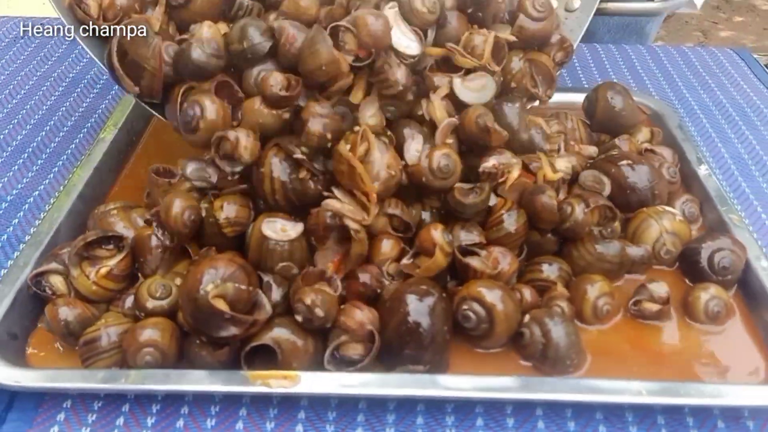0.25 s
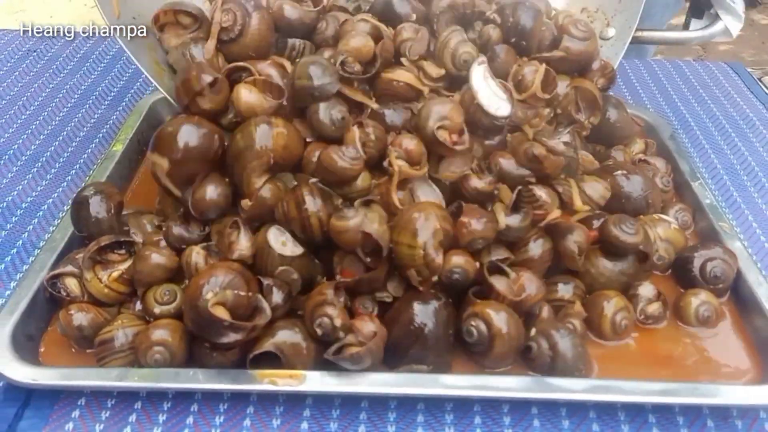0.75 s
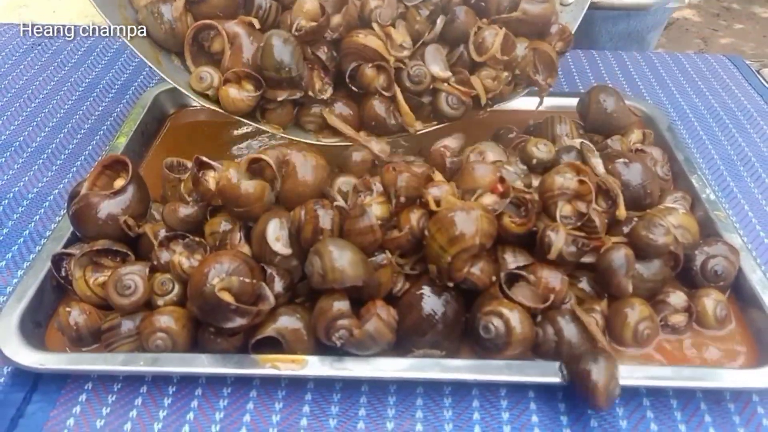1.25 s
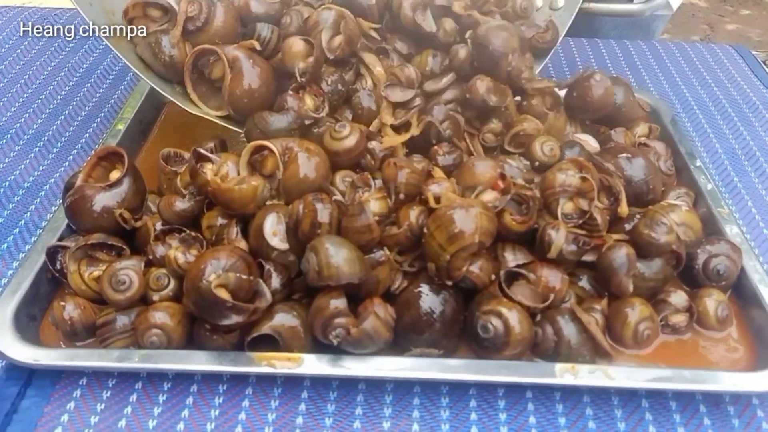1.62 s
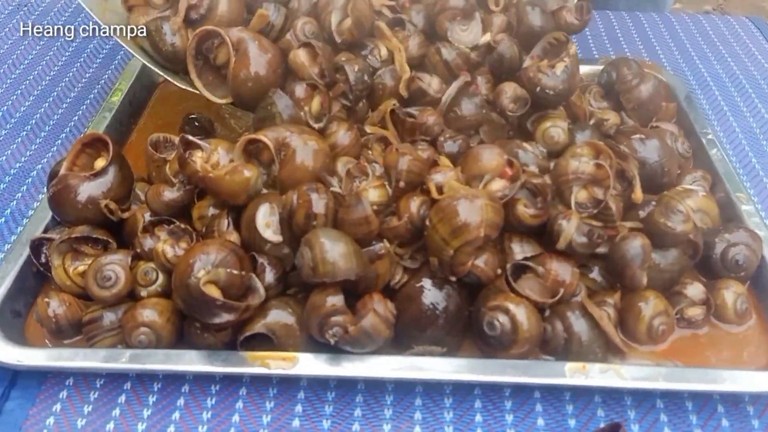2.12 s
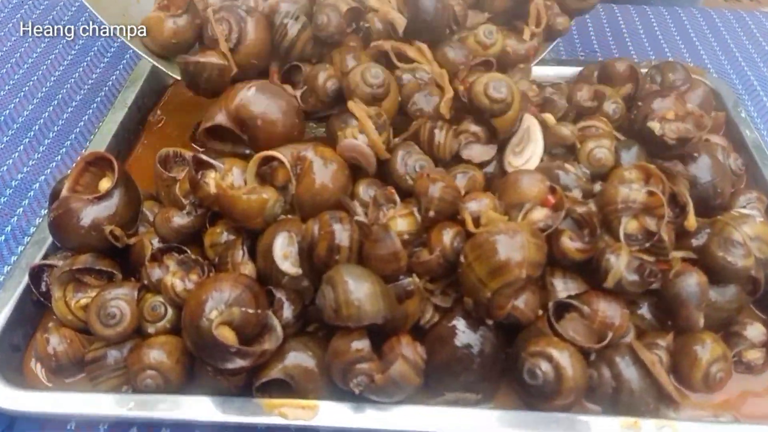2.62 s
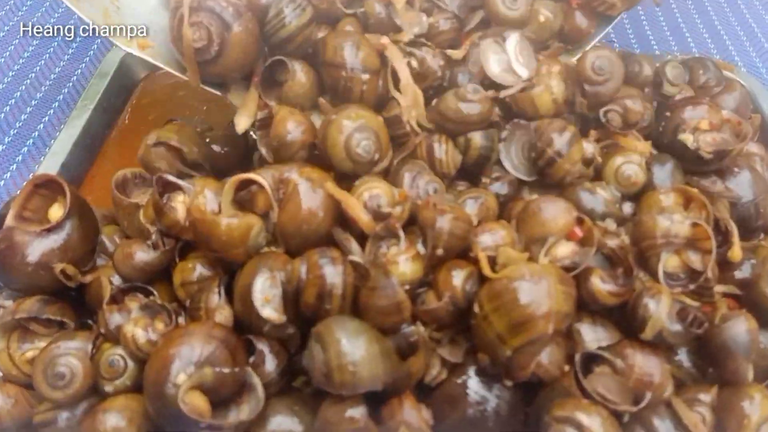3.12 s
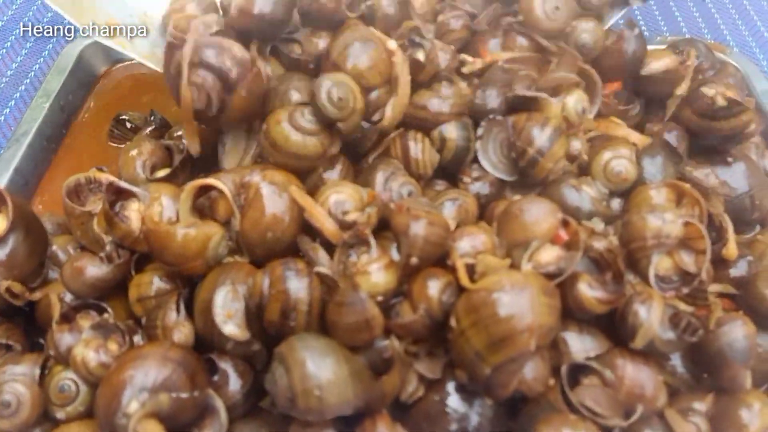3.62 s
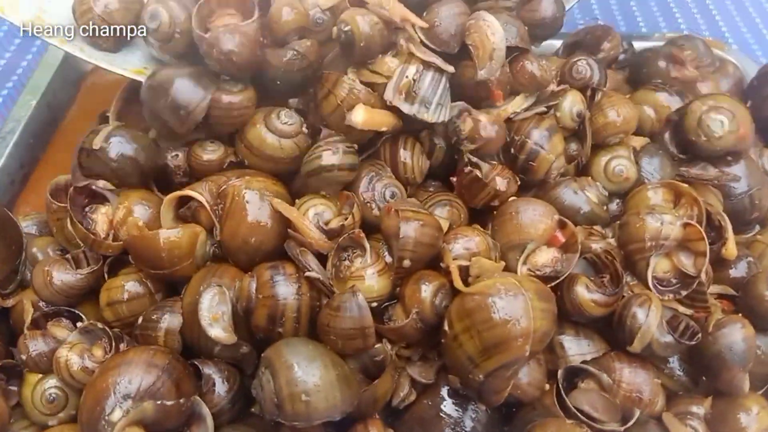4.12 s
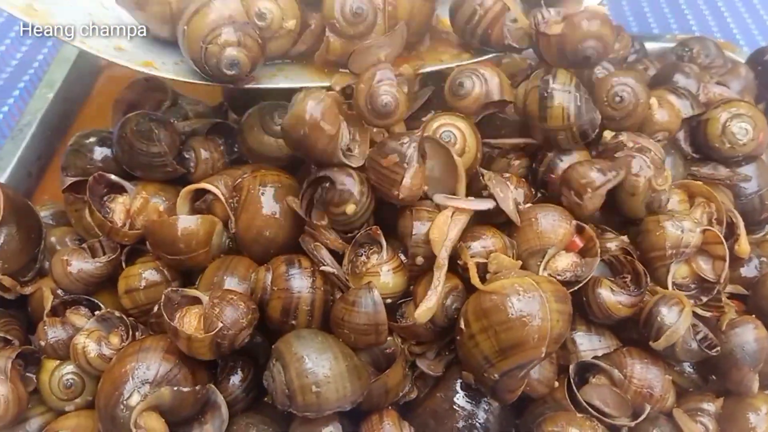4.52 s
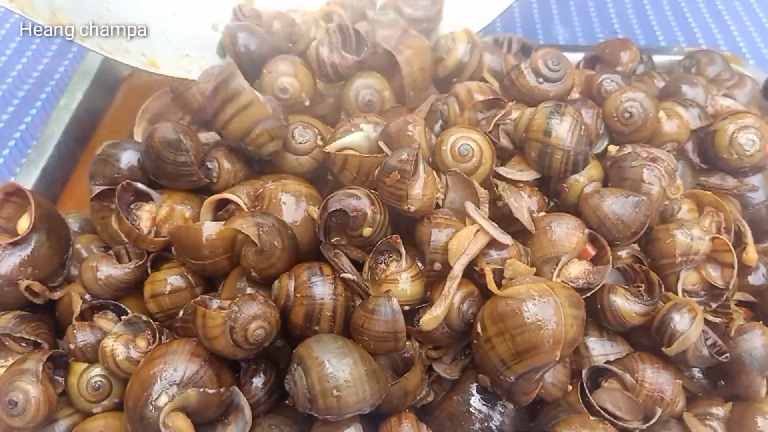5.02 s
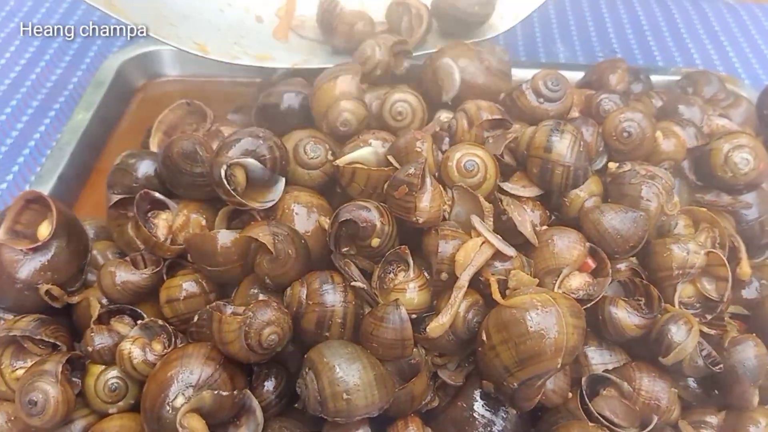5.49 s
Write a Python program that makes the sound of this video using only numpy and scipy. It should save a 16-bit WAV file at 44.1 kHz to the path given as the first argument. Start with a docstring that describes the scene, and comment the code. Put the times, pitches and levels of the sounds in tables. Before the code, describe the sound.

Wet snail shells pour from a metal pan onto a heap in a steel tray, clattering in dense, hollow, rattling bursts.

```python
"""Wet snail shells slide out of a tilted pan and knock down a heap on a steel tray, near a two-port microphone.
From the start, slides of many small knocks swell and die over a trickle and quiet air, with harder single
knocks: each rings the hollow of a shell and its thin wall, and the heap answers with a dull note. Now and then
a shell rings the bare tray. Dry clicks fill gaps from 1.2 s on; from 1.5 s the tray thuds at times on the
table. Near 5 s a sliding shell squeaks, and at the end two shells ring the emptied pan."""
import sys
import numpy as np
from scipy import signal
from scipy.fft import rfft, irfft, next_fast_len
from scipy.io import wavfile
from scipy.ndimage import uniform_filter1d

SR = 44100
rng = np.random.default_rng(int(sys.argv[2]) if len(sys.argv) > 2 else 0)


def convert_level_to_amplitude(level_db):
    """Map a level in decibels to its linear amplitude factor."""
    exponent = np.asarray(level_db, float) / 20
    return 10 ** exponent


def file_out(sig):
    """Save sig as 16-bit WAV at sys.argv[1]."""
    # one column per channel
    cols = np.atleast_2d(sig).T
    # limit, then scale
    lim = np.clip(cols, -1, 1)
    pcm = np.round(lim * 32767).astype(np.int16)
    wavfile.write(sys.argv[1], SR, pcm)


N = 253575  # length in samples

# Tone of the quiet air. Each row: frequency in Hz, gain in dB.
AIR_TONE = [(30, -1), (120, 8), (400, 1), (1000, 6), (2500, -20), (8000, -22), (15000, -44)]
# The tray thudding on the table. Each row: start in seconds, level in dB, bump pitch in Hz, hum level in dB.
THUDS = [(1.526, -19.5, 135, -40), (1.979, -38, 170, -58), (3.223, -25.5, 178, -58),
         (4.708, -28.5, 142, -62), (5.36, -28.5, 200, -61)]
# Ringing modes of the steel tray. Each row: pitch in Hz, relative level in dB, time to fall 60 dB in seconds.
TRAY_MODES = [(1357, -9.5, 0.096), (1768, -12, 0.045), (2220, -21, 0.1), (2800, -23, 0.041)]
# Shells striking bare tray. Each row: start in seconds, peak level in dB.
TRAY_HITS = [(.305, -13.5), (.482, -13.5), (2.0, -24), (2.545, -10)]
# Ringing modes of the pan. Each row: pitch in Hz, relative level in dB, time to fall 60 dB in seconds.
PAN_MODES = [(1620, 1, 0.11), (2120, 1.5, 0.088), (2720, -21, 0.09), (3160, -9, 0.094), (4050, 6, 0.049)]
# Shells striking the emptied pan. Each row: start in seconds, peak level in dB.
PAN_HITS = [(5.574, -4), (5.726, -24)]
# A wet shell squeaks as it slides. Each row: time in seconds, whistle pitch in Hz, level in dB.
SQUEAK_PATH = [(5.014, 2350, -54), (5.04, 2790, -44.5), (5.082, 3460, -51)]
# Low modes of the wet heap, whose note shifts as the tray fills. Each row: pitch in Hz, relative level in dB
# at the start, time to fall 60 dB in seconds, level change in dB per second.
HEAP_MODES = [(136, -12, 0.029, 0), (270, -9, 0.019, -0.2), (551, -3.5, 0.018, .5), (748, 1, 0.014, -1.18),
              (1076, -10, 0.014, 2.5)]
# Heavy shells landing deep in the heap. Each row: start in seconds, peak level in dB, pitch in Hz.
DULL_KNOCKS = [(0.053, -19.5, 830), (0.256, -25.5, 577), (0.27, -19.5, 686), (0.421, -28.5, 650),
               (0.459, -23, 900), (0.762, -15, 760), (0.974, -23.5, 720), (1.639, -20.5, 680),
               (2.328, -27, 630), (2.363, -24, 685), (2.528, -15.5, 676), (3.058, -22, 580),
               (3.438, -29, 575), (3.707, -29, 600), (3.798, -24.5, 566), (3.838, -25, 614),
               (3.854, -21, 573), (3.958, -27, 580), (4.006, -22, 610), (4.7, -31.5, 660),
               (5.184, -24, 523), (5.375, -32, 810), (5.574, -16.5, 624)]
# Tone of the gritty contact between shells. Each row: frequency in Hz, gain in dB.
CONTACT_TONE = [(400, -15.5), (1100, -2.5), (1700, -0.5), (2500, 1), (4500, -3), (7500, -3), (11000, -18),
                (15000, -29)]
# Small dry clicks between the knocks. Each row: time in seconds, peak level in dB, pitch in Hz.
CLICKS = [(1.2222, -24, 2260), (1.2554, -26, 1570), (1.2693, -23.5, 1370), (1.285, -31, 1870),
          (1.3644, -17, 1610), (1.3871, -21, 2610), (1.425, -22.5, 1910), (1.4496, -29, 2790),
          (1.71, -24, 2200), (1.806, -25, 2580), (1.8218, -24, 2550), (1.851, -23.5, 2230),
          (1.909, -21.5, 5950), (1.9694, -28, 2050), (2.0623, -28, 2280), (2.0712, -23.5, 2690),
          (2.161, -22, 2280), (3.931, -5.5, 5780), (3.9407, -19.5, 2520), (4.808, -19.5, 2600),
          (4.8199, -16, 1820), (4.9914, -24, 2420), (5.4455, -41, 2610)]
# Slides of small shells. Each row: time of the top in seconds, level of the hollows in dB, rise time in seconds,
# fall time in seconds, level of the walls over the hollows in dB.
SLIDES = [(0.052, -24.5, 0.11, 0.11, -4.5), (.15, -32, 0.051, 0.14, -1), (0.283, -17.5, 0.067, 0.066, -8),
          (0.421, -29.5, 0.036, 0.27, -5), (0.47, -20.5, 0.079, 0.042, -17),
          (0.604, -26, 0.054, 0.093, -6.5), (0.757, -19, 0.059, 0.079, -10.5),
          (0.849, -31, 0.06, 0.039, -8), (.938, -25.5, 0.13, 0.1, -7.5), (1.041, -30.5, 0.12, 0.13, -1.5),
          (1.178, -29, 0.038, 0.084, -8), (1.4, -34, 0.23, 0.17, 0), (1.645, -16, 0.042, 0.04, -19),
          (1.689, -32, 0.087, 0.1, 0), (1.833, -39, 0.056, 0.23, -0.5), (2.007, -27, 0.085, 0.047, -12),
          (2.078, -37.5, 0.13, 0.0095, -1.5), (2.163, -34, 0.081, 0.18, -9),
          (2.356, -22, 0.065, 0.079, -11.5), (2.549, -15.5, 0.055, 0.063, -11.5),
          (2.66, -36, 0.24, 0.16, -1), (2.804, -27.5, 0.16, 0.095, -4.5), (2.926, -36.5, 0.1, 0.16, -5),
          (3.063, -22.5, 0.07, 0.088, -7.5), (3.118, -43.5, 0.091, 0.075, 9.5),
          (3.229, -29, 0.064, 0.017, -4.5), (3.264, -33.5, 0.016, 0.067, 1.5),
          (3.35, -40, 0.0095, 0.092, -1), (3.428, -29.5, 0.087, 0.16, -5),
          (3.582, -29.5, 0.011, 0.06, -12.5), (3.703, -32, 0.039, 0.031, -9),
          (3.808, -21, 0.074, 0.13, -11), (4.007, -26.5, 0.12, 0.063, -10), (4.09, -37.5, 0.13, 0.086, 1),
          (4.175, -30, 0.12, 0.082, -5), (4.24, -37, 0.015, 0.045, 4), (4.34, -37.5, 0.085, 0.23, 0.5),
          (4.45, -31, 0.054, 0.18, -10), (4.546, -33.5, 0.047, 0.095, -6), (4.615, -39.5, 0.045, 0.042, 9),
          (4.721, -38, 0.12, 0.065, 3.5), (4.825, -35.5, 0.12, 0.028, -4.5),
          (4.949, -47, 0.019, 0.075, 5.5), (5.172, -18.5, 0.06, 0.064, -5.5),
          (5.295, -32.5, 0.09, 0.063, -2.5), (5.363, -31, 0.021, 0.051, -4.5),
          (5.487, -33.5, 0.06, 0.17, -7), (5.577, -17, 0.018, 0.047, -40), (5.66, -42, 0.054, 0.095, -4.5),
          (5.729, -37, 0.26, 0.017, -29)]
# Single hard knocks, before they stray to the sides. Each row: time in seconds, level of the hollow in dB,
# pitch of the hollow in Hz, level of the wall in dB, pitch of the wall in Hz.
KNOCKS = [(0.0547, -15.5, 1710, -31, 5940), (0.0922, -29, 2320, -13.5, 7200),
          (0.13, -30, 2400, -11.5, 5800), (0.141, -35, 2440, -11.5, 7200), (0.231, -27, 2300, -17, 4880),
          (0.266, -7, 2690, -29, 4850), (0.2724, -9, 2160, -29, 5070), (0.2787, -7, 2325, -22, 7240),
          (0.285, -5.5, 2200, -25, 6300), (0.3, -16, 1780, -11.5, 7320), (0.3206, -12.5, 2510, -20, 9100),
          (0.42, -18, 2190, -32, 6230), (0.4584, -20, 1920, -14, 9500), (0.4815, -9.5, 1940, -13, 6240),
          (0.553, -26, 2820, -7, 5100), (0.625, -20.5, 2900, -11, 5200), (0.7594, -9, 2220, -23, 4800),
          (0.7836, -11, 2210, -14, 7000), (0.7919, -17.5, 1760, -13, 5430), (0.839, -18.5, 2310, -6, 7070),
          (0.8995, -18.5, 2530, -15, 9800), (0.9207, -14, 2450, -25, 8260),
          (0.9334, -14.5, 2240, -30, 6900), (0.961, -36, 2650, -10, 8500), (0.97, -23, 1860, -9, 7200),
          (0.982, -32, 2350, -5, 5870), (1.0248, -11, 2500, -27, 5540), (1.1418, -22, 2900, -16, 7070),
          (1.1822, -14.5, 2630, -23, 6840), (1.3153, -27, 1880, -19, 5920),
          (1.3235, -40, 2560, -14.5, 8300), (1.3405, -16.5, 2190, -7.5, 9040),
          (1.6351, -7, 2160, -38, 5810), (1.643, -13, 2570, -16, 7440), (1.6527, -9, 2550, -20, 4300),
          (1.6813, -15, 2320, -5, 5770), (1.7399, -21, 2750, -20, 6570), (1.8868, -28, 2070, -24, 5780),
          (2.1088, -21.5, 2500, -19.5, 6000), (2.335, -22, 2150, -18, 6400), (2.3524, -4.5, 2170, -9, 7400),
          (2.3661, -9.5, 1854, -25, 6800), (2.4857, -29, 2700, -16, 6700), (2.5312, -7, 2196, -19, 4440),
          (2.544, 0.5, 2156, -16, 4360), (2.5561, -4.5, 1875, -27, 7150), (2.573, -7.5, 2250, -31, 4300),
          (2.654, -23.5, 2640, -22, 6500), (2.7439, -12, 2490, -38, 4390), (2.7986, -32, 2620, -13.5, 7400),
          (2.9203, -19.5, 2460, -15, 6450), (3.0579, -2.5, 2183, -37, 5050),
          (3.0817, -19, 2220, -15.5, 8300), (3.219, -22, 2570, -20, 6560), (3.256, -13.5, 2860, -10, 7350),
          (3.2611, -29, 2720, -5.5, 7400), (3.341, -15.5, 2580, -22, 7200),
          (3.4301, -14.5, 2166, -17, 7710), (3.4412, -11, 2150, -23, 8250), (3.478, -25, 2460, -16, 4300),
          (3.5004, -23.5, 2220, -15.5, 6300), (3.5733, -19, 2360, -19, 4300),
          (3.679, -24.5, 1860, -30, 4900), (3.71, -12, 2120, -35, 5340), (3.801, -8.5, 2250, -23, 4270),
          (3.8198, -5, 2660, -9, 6400), (3.8384, -20, 2300, -32, 4800), (3.8559, -17.5, 2086, -6, 4430),
          (3.8967, -14.5, 1740, -13.5, 6300), (3.9603, -20, 2120, -26, 5270),
          (4.0077, -15, 2440, -13, 7200), (4.0284, -30, 2110, -12.5, 8100), (4.094, -20.5, 1800, -11, 8560),
          (4.137, -27, 1650, -14.5, 6000), (4.174, -31, 2440, -13.5, 8560),
          (4.1835, -15.5, 2700, -37, 6890), (4.308, -28, 2730, -13, 6500), (4.337, -38, 3660, -21, 9240),
          (4.35, -18.5, 2720, -20, 7200), (4.4255, -17, 2330, -16, 6100), (4.4464, -20.5, 2490, -14, 6070),
          (4.4877, -18, 2210, -15.5, 6300), (4.5353, -18.5, 2310, -13.5, 7090),
          (4.5445, -48, 2800, -7.5, 6500), (4.6116, -20, 2230, -25, 4700),
          (4.6485, -28.5, 2740, -19.5, 8200), (4.6754, -30, 2000, -22, 5080), (4.7069, -34, 2270, -8, 7270),
          (4.7314, -38, 2030, -13.5, 6340), (4.783, -23.5, 2130, -19, 6200), (4.9288, -25, 2120, -34, 4570),
          (4.9428, -29, 2470, -15.5, 4150), (4.9616, -39, 2190, -19.5, 7700), (5.01, -31, 2630, -21, 4370),
          (5.1513, -8, 2720, -25, 6280), (5.164, -19, 2730, -25, 5080), (5.1774, -11, 2800, -8, 4260),
          (5.1852, -11.5, 2340, -11, 6300), (5.246, -19, 2220, -38, 6020), (5.2712, -18.5, 2200, -39, 7600),
          (5.351, -17.5, 2790, -20, 6850), (5.3777, -18, 2540, -33, 7300), (5.5742, -14, 1620, -13, 4800),
          (5.607, -31, 2100, -23, 5800)]
# The left port faces the heap and hears more treble. Each row: frequency in Hz, gain in dB.
LEFT_PORT_TONE = [(5000, -.5), (14000, 2)]

RIGHT_LAG_S = 1.4e-4  # usual delay at the right port: the left one is nearer to the pan
AIR_DB, ECHO_DB = -55.5, -11  # level of the air; scattered sound under the direct
PLACE_DB, SCATTER_DB = 2, 4  # shells land a little to the left (left-right dB); single knocks stray from there
HEAP_DB, HEAP_FOLLOW = -20.5, 0.7  # the heap note follows the hollows, dB for dB times this share
SWELL_DB = 20  # the hollows of a slide gain this much in its rise time and lose it in its fall time
WALL_SWELL = 0.85  # walls swell less steeply: this share of the hollows' dB
EDGE_POWER = 1.3  # above 1: slides have rounded tops and steep ends
TRICKLE_DB, WALL_TRICKLE_DB = -51.5, -61.5  # a trickle never stops: hollows, walls
DRY_T60_S, LONGER_T60_S = .011, .014  # hollow ring of a light blow, and what the hardest adds
LIGHT_DB = 18  # range in dB between a light and a hard single knock
CROWDING, QUIET_DB = 1.2, -33  # the firmest blows: dB more of them per dB of flow above the quiet level


def evened(x):
    """Scales a sound to an rms level of 1."""
    return x / np.sqrt(np.mean(x ** 2) + 1e-20)


def steadied(x, size=2000):
    """Divides out the level averaged over size samples, so that another curve can set it."""
    power = uniform_filter1d((x ** 2).mean(0), size)
    return x / np.sqrt(abs(power) + 1e-12)


def colour(x, points):
    """Filters by a tone curve given as (Hz, dB) points, joined by straight lines over log frequency."""
    size = next_fast_len(x.shape[-1])
    hz, db = np.transpose(points)
    log_hz = np.log(np.fft.rfftfreq(size, 1 / SR) + 1)
    curve_db = np.interp(log_hz, np.log(hz + 1), db)
    return irfft(rfft(x, size) * convert_level_to_amplitude(curve_db), size)[..., :x.shape[-1]]


def add(mix, s, sound):
    """Mixes a two-channel sound in at time s."""
    part = mix[:, max(round(s * SR), 0):][:, :sound.shape[1]]
    part += sound[:, :part.shape[1]]


def sides(left_right_db):
    """Left and right gains that differ by this many dB."""
    return convert_level_to_amplitude(np.array([[.5], [-.5]]) * left_right_db)


def ring(hz, t60, rise_s, lag_s, phase, size=1024):
    """A mode that swells in about rise_s and dies, peak 1, heard at each port after its own lag."""
    t = np.maximum(np.arange(size) / SR - np.reshape(lag_s, (2, 1)), 0)
    swell = (1 - np.exp(-t / rise_s)) ** 2
    wave = swell * convert_level_to_amplitude(-60 * t / t60) * np.sin(2 * np.pi * hz * t + phase)
    return wave / abs(wave).max()


def quiet_air():
    """Soft low background air is coloured noise; its bass is shared by both ports."""
    noise = rng.standard_normal((3, N))
    shared = colour(noise[2], [(20, 30.0), (500, 27.0), (1500, 18.5), (20000, -37)])
    return convert_level_to_amplitude(AIR_DB) * evened(colour(noise[:2] * .5 + shared, AIR_TONE))


def thuds():
    """A sharp wooden knock over a low damped bump; the table hums on for a moment."""
    out = np.zeros((2, N))
    alike = [0, 0]
    for s, db, hz, hum_db in THUDS:
        bump = 0.47 * ring(hz, 0.039, 0.0012, alike, 0, size=12000)
        bump -= 0.45 * ring(10.3 * hz, 0.006, 1e-4, alike, 0, size=12000)
        bump -= 0.72 * ring(4.0 * hz, 0.008, 0.00015, alike, 0, size=12000)
        hum = ring(119.8, 0.55, 0.0042, alike, 0, size=12000)
        add(out, s, convert_level_to_amplitude(db) * bump + convert_level_to_amplitude(hum_db) * hum)
    return colour(out, [(30, -30), (100, -1.0)])


def struck(hits, modes):
    """Bare metal rings all its modes at once after a direct blow."""
    out = np.zeros((2, N))
    note = np.zeros((2, 9000))
    for k, (hz, db, t60) in enumerate(modes):
        note += (-1) ** k * convert_level_to_amplitude(db) * ring(hz, t60, 0.000072, [0, RIGHT_LAG_S], 0, size=9000)
    for s, db in hits:
        add(out, s, convert_level_to_amplitude(db) * note / abs(note).max())
    return out


def squeak():
    """A rough rising whistle over a weaker low note, as a wet shell slides."""
    s, hz, db = np.transpose(SQUEAK_PATH)
    t, out = np.arange(s[0], s[-1], 1 / SR), np.zeros((2, N))
    fuzz = 1 + .7 * evened(uniform_filter1d(rng.standard_normal((2, len(t))), 160))
    whistle = np.sin(2 * np.pi * np.cumsum(np.interp(t, s, hz)) / SR)
    low_note = 0.47 * np.sin(2 * np.pi * 700 * t)
    tone = (whistle + low_note) * signal.windows.tukey(len(t), .3)
    add(out, s[0], fuzz * tone * convert_level_to_amplitude(np.interp(t, s, db)))
    return out


def echoes(x, t60=.03, count=3):
    """Pan, tray rim and nearby shells scatter sound: sparse random taps, whose colour turns slowly and steadily."""
    taps = np.zeros((count, 2, 3000))
    at = np.arange(30, 2980, 20) + rng.integers(0, 20, (count, 2, 148))
    np.put_along_axis(taps, at, rng.choice([-1., 1.], at.shape), 2)
    fade = convert_level_to_amplitude(-60 * np.arange(3000) / SR / t60)
    taps = colour(taps * fade, [(500, -81), (2000, -15.0), (12000, -14.0)])
    taps = taps / np.linalg.norm(taps, axis=2, keepdims=True)
    # the sound moves in turn through the sets of taps, which avoids a fixed comb
    turn = 2 * np.pi * (7 * np.arange(N) / SR + np.arange(count)[:, None, None] / count)
    parts = np.sqrt(2 / count) * np.cos(turn / 2) * x
    return signal.oaconvolve(parts, taps, axes=2)[..., :N].sum(0)


def heap(shells, hollow_db):
    """Every knock also pushes the wet heap: broad low modes, nearly alike at both ports."""
    t = np.arange(N) / SR
    push = uniform_filter1d(abs(shells).sum(0), 60) * rng.standard_normal((3, N))
    push = push[0] + 0.26 * push[1:]  # one shared push, and a little of each port's own
    dull = np.zeros((2, N))
    for k, (hz, db, t60, drift_db) in enumerate(HEAP_MODES):
        mode = signal.oaconvolve(push, ring(hz, t60, 0.00025, [0, 0], 0), axes=1)[:, :N]
        dull += (-1) ** k * convert_level_to_amplitude(db + drift_db * t) * mode
    return steadied(dull) * convert_level_to_amplitude(HEAP_FOLLOW * hollow_db + HEAP_DB)


def dull_knocks():
    """A heavy shell deep in the heap: a firm low note with a shorter neighbour, alike at both ports."""
    out = np.zeros((2, N))
    draws = rng.uniform(-0.86, 1, (len(DULL_KNOCKS), 2))
    for (s, db, hz), draw in zip(DULL_KNOCKS, draws):
        note = ring(hz, 0.024, 0.00088, [0, 0], 0, size=2000)
        note += 0.94 * ring(hz * 1.08 ** draw[0], 0.011, 0.00022, [0, 0], np.pi * draw[1], size=2000)
        add(out, s, convert_level_to_amplitude(db) * note / abs(note).max())
    return out


def clicks():
    """A short broad ring with grit: small shells touching edge on."""
    out, t = np.zeros((2, N)), np.arange(400) / SR
    grits = rng.standard_normal((len(CLICKS), 2, len(t)))
    for (s, db, hz), grit in zip(CLICKS, grits):
        click = ring(hz, 0.0052, 0.000074, [0, RIGHT_LAG_S], 0, size=len(t))
        click += 1.04 * colour(grit, CONTACT_TONE) * convert_level_to_amplitude(-60 * t / 0.012)
        add(out, s - 5e-4, convert_level_to_amplitude(db) * click / abs(click.mean(0)).max())
    return out


def shell(hollow_hz, wall_hz, draw, grit, force):
    """Hollow and wall each ring as a main mode with two neighbours; the contact adds a gritty tick to both.
    A hard blow (force 1) rings the hollow longer and purer, a light one (0) is dry."""
    lag_s = np.array([0, RIGHT_LAG_S * (1 + .5 * draw[0])])  # set by the place on the heap
    bent_s = lag_s * .6  # lower tones bend round the microphone's body on a shorter path
    phase, t = np.pi * draw[1:5], np.arange(700) / SR
    hollow = ring(hollow_hz, DRY_T60_S + LONGER_T60_S * force, 0.00037, bent_s, phase[0], size=700)
    wall = ring(wall_hz, 0.006, 0.00021, lag_s, phase[1], size=700)
    for k in (2, 3):  # neighbours radiate unevenly: each port hears them with its own strength
        uneven = 1 + np.clip(2.54 * draw[k + 5], -1, 1) * np.array([[1], [-1]])
        near_hollow_hz, near_wall_hz = hollow_hz * 1.441 ** draw[k + 3], wall_hz * 1.67 ** draw[k + 2]
        hollow += 0.59 * uneven * ring(near_hollow_hz, 0.017, 0.0003, bent_s, phase[k], size=700)
        wall += 0.24 * uneven * ring(near_wall_hz, 0.0027, 0.000043, lag_s, phase[k], size=700)
    tick = colour(grit, CONTACT_TONE) * (1 - np.exp(-t / 0.00073)) * convert_level_to_amplitude(-60 * t / 0.0084)
    hollow = hollow + (1.6 - 1.17 * force) * tick
    wall = wall + 3.24 * tick[::-1]  # the same tick with the ports swapped
    return hollow / abs(hollow.mean(0)).max(), wall / abs(wall).max()


def flow():
    """Levels in dB of hollows and walls: the powers of all slides and the trickle add up."""
    t = np.arange(0, N / SR, .001)
    s, db, rise_s, fall_s, over_db = np.transpose(SLIDES)[..., None]
    away = np.where(t < s, (s - t) / rise_s, (t - s) / fall_s)
    away_db = SWELL_DB * away ** EDGE_POWER
    hollows = (convert_level_to_amplitude(db - away_db) ** 2).sum(0) + convert_level_to_amplitude(TRICKLE_DB) ** 2
    walls = (convert_level_to_amplitude(db + over_db - WALL_SWELL * away_db) ** 2).sum(0) + convert_level_to_amplitude(WALL_TRICKLE_DB) ** 2
    return [np.interp(np.arange(N) / SR, t, 10 * np.log10(power)) for power in (hollows, walls)]


def swarm(hollow_db, wall_db, per_s=950, spread_db=4.5, count=40):
    """Many shells of different sizes knock lightly, in clumps; hollows and walls follow the flow.
    In a strong slide the firm, ringing blows crowd together; a weak one is sparse and dry."""
    slow_noise = uniform_filter1d(uniform_filter1d(rng.standard_normal(N), 200), 200)
    clumps = convert_level_to_amplitude(2.49 * evened(slow_noise))
    hollows, walls = np.zeros((2, N)), np.zeros((2, N))
    for k, j in enumerate(rng.permutation(count)):
        force = rng.random()
        crowd = convert_level_to_amplitude(CROWDING * force * (hollow_db - QUIET_DB))
        blows = rng.random(N) < crowd * per_s / count / SR  # per_s: all shells together, at QUIET_DB
        train = blows * convert_level_to_amplitude(spread_db * np.minimum(rng.exponential(1, N), 3))
        hollow_hz, wall_hz = 1750 * 1.759 ** (k / count), 3600 * 2.638 ** (j / count)
        place = sides(2.0 * rng.standard_normal())
        draw, grit = rng.uniform(-0.934, 1, 9), rng.standard_normal((2, 700))
        hollow, wall = shell(hollow_hz, wall_hz, draw, grit, force)
        knock = np.vstack([place * hollow, place * wall])
        both = signal.oaconvolve((train * clumps)[None], knock, axes=1)
        hollows += both[:2, :N]
        walls += both[2:, :N]
    hollows = np.array([evened(port) for port in hollows])
    walls = np.array([evened(port) for port in walls])
    return steadied(hollows) * convert_level_to_amplitude(hollow_db) + steadied(walls) * convert_level_to_amplitude(wall_db)


def knocks():
    """Single hard knocks; hollow and wall take about a millisecond to reach their peak."""
    out = np.zeros((2, N))
    draws = rng.uniform(-0.84, 1, (len(KNOCKS), 10))
    grits = rng.standard_normal((len(KNOCKS), 2, 700))
    for (s, hollow_db, hollow_hz, wall_db, wall_hz), draw, grit in zip(KNOCKS, draws, grits):
        force = np.clip(2 + hollow_db / LIGHT_DB, 0, 1)
        hollow, wall = shell(hollow_hz, wall_hz, draw, grit, force)
        place = sides(SCATTER_DB * draw[9])
        add(out, s - 1.4e-3, place * convert_level_to_amplitude(hollow_db) * hollow)
        add(out, s - 6e-4, place * convert_level_to_amplitude(wall_db) * wall)
    return out


def scene():
    """Shells, what they set ringing, and the air around."""
    hollow_db, wall_db = flow()
    shells = (knocks() + clicks() + swarm(hollow_db, wall_db)) * sides(PLACE_DB)
    near = shells + convert_level_to_amplitude(ECHO_DB) * echoes(shells) + squeak()
    metal = struck(TRAY_HITS, TRAY_MODES) + struck(PAN_HITS, PAN_MODES)
    low = heap(shells, hollow_db) + dull_knocks() + thuds() + quiet_air()
    return near + metal + low * sides(1.4)


def roll_off(x):
    """The treble ends steeply here."""
    return signal.sosfilt(signal.butter(12, 16440, fs=SR, output="sos"), x)


def record(dry):
    """The microphone colours the sound, its left port a little more, and overloads softly."""
    mic = colour(dry, [(20, -15), (100, -11.5), (200, -1.0), (9000, 2.0), (13000, 5.5), (15200, 3.5), (16400, -22)])
    mic = np.array([colour(mic[0], LEFT_PORT_TONE), mic[1]])
    mix = 1.497 * np.tanh(mic / 1.521)
    return roll_off(mix)


dry = scene()
out = record(dry)
file_out(out)
```